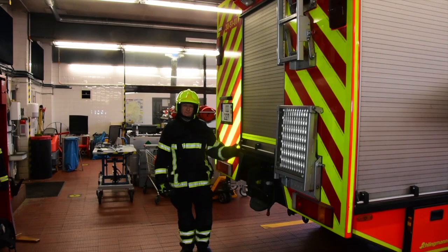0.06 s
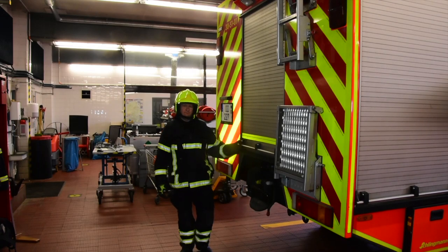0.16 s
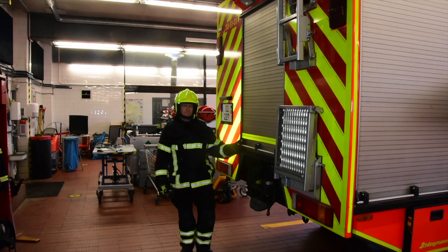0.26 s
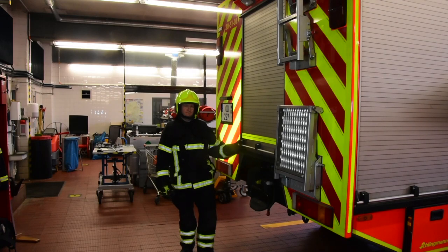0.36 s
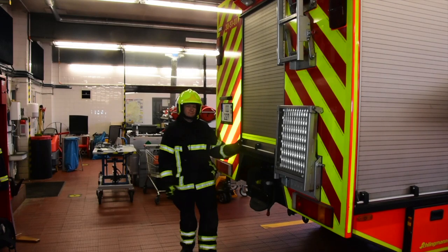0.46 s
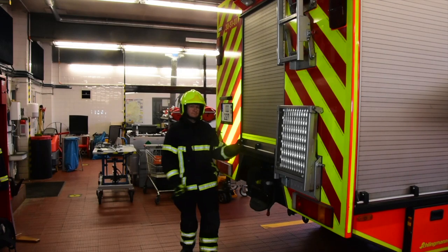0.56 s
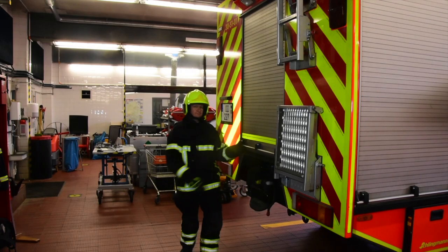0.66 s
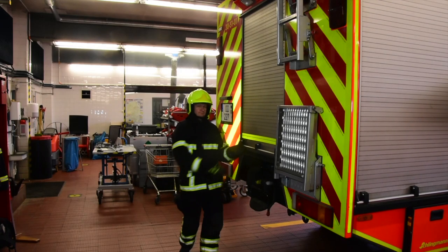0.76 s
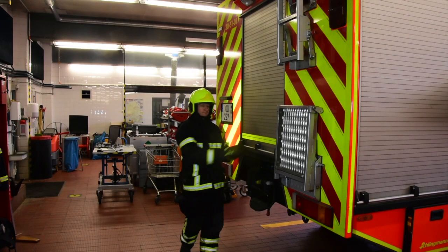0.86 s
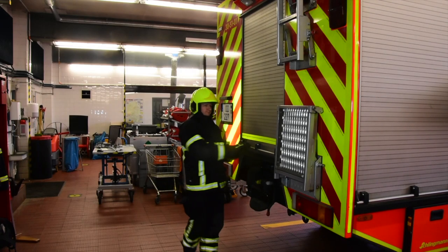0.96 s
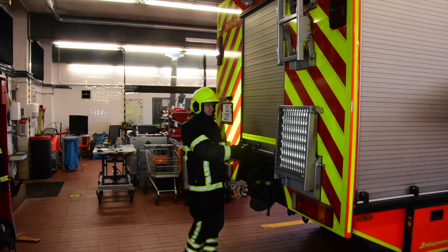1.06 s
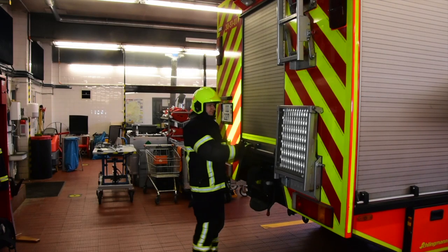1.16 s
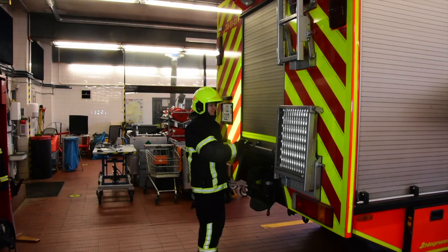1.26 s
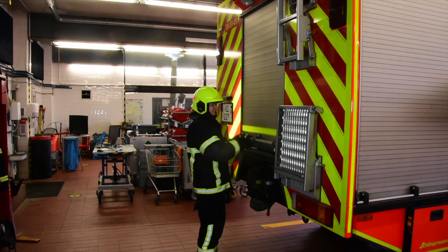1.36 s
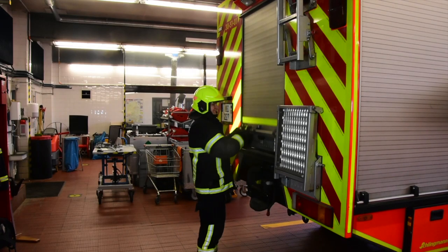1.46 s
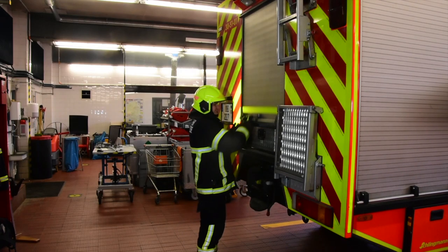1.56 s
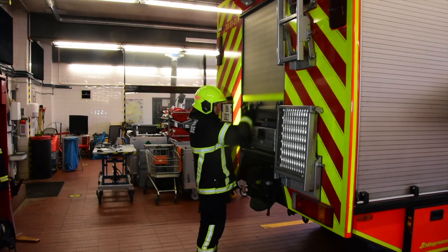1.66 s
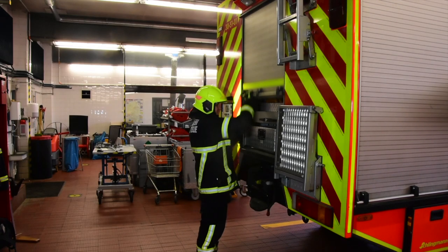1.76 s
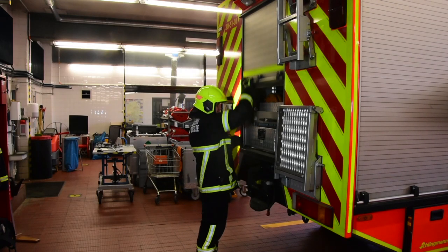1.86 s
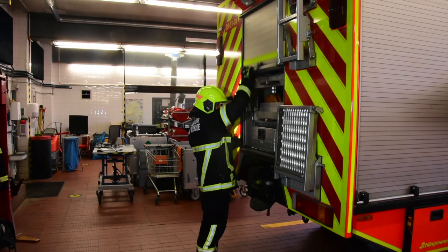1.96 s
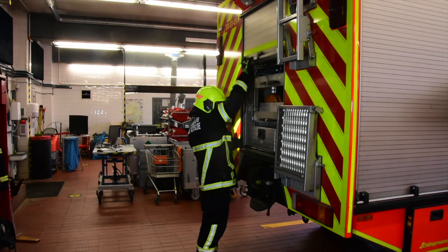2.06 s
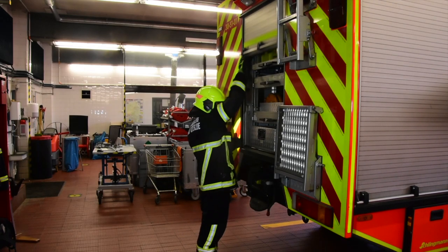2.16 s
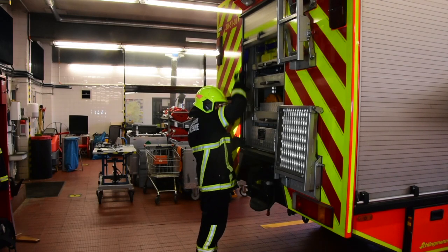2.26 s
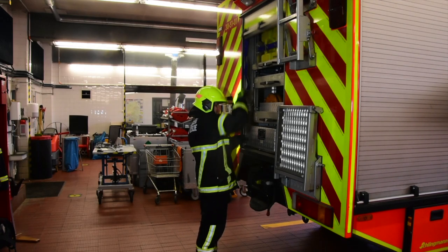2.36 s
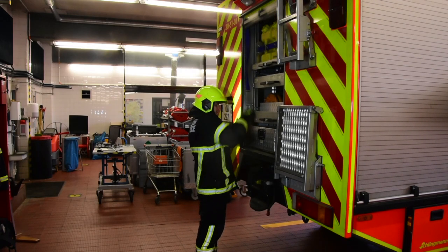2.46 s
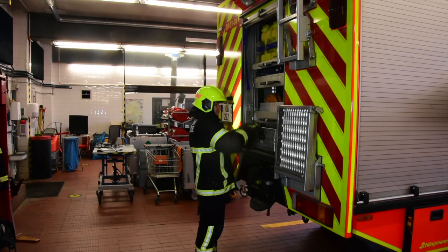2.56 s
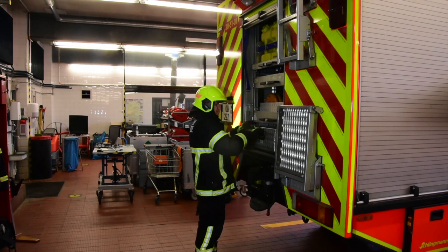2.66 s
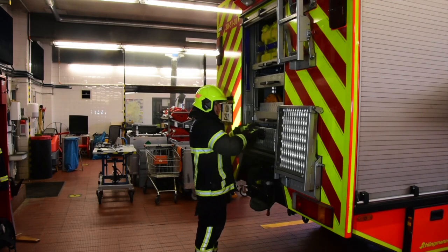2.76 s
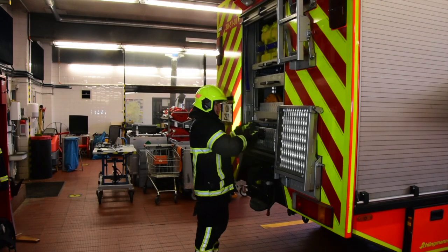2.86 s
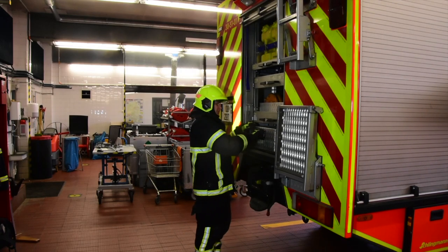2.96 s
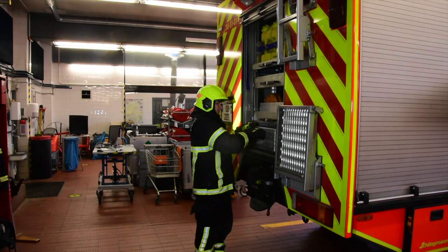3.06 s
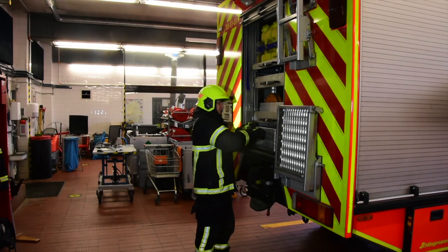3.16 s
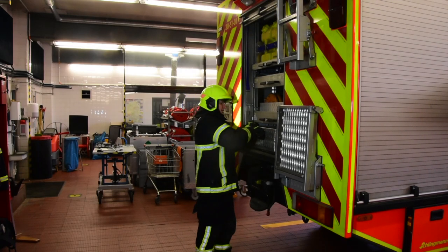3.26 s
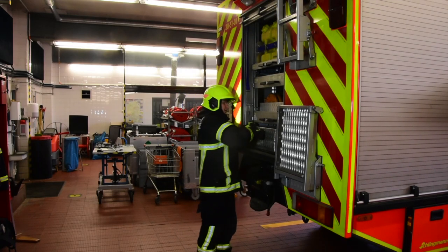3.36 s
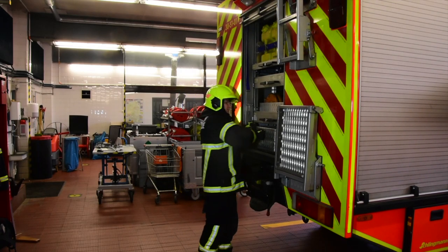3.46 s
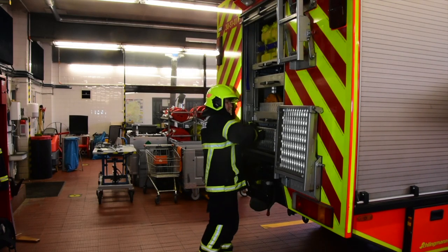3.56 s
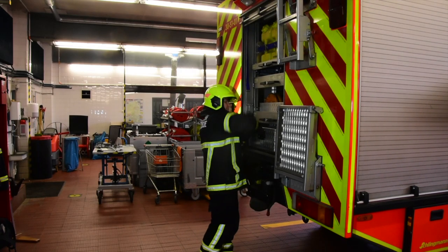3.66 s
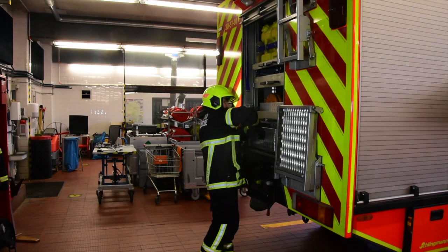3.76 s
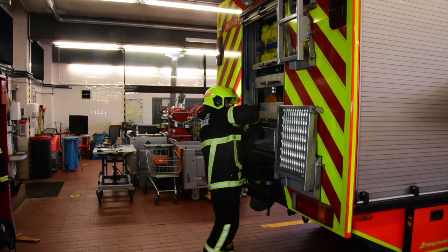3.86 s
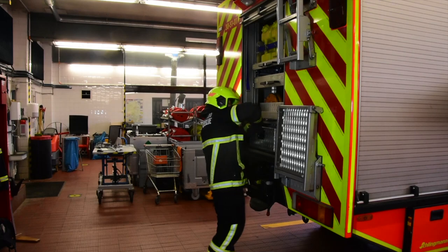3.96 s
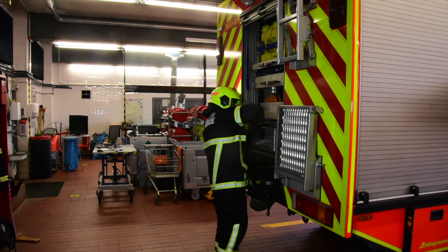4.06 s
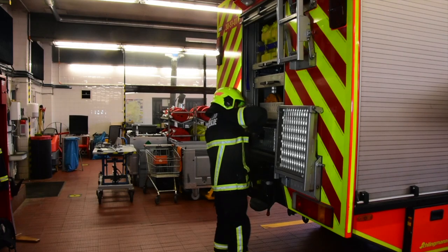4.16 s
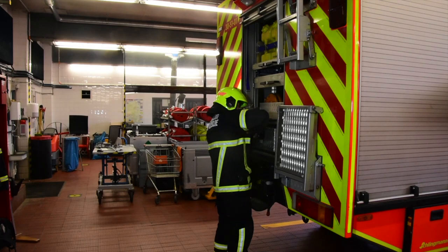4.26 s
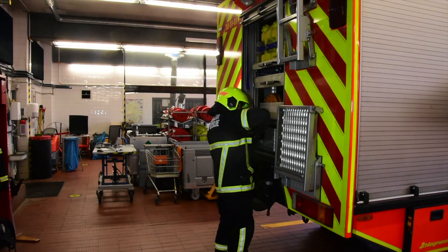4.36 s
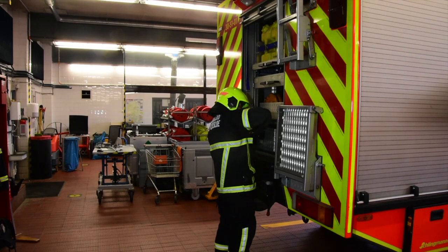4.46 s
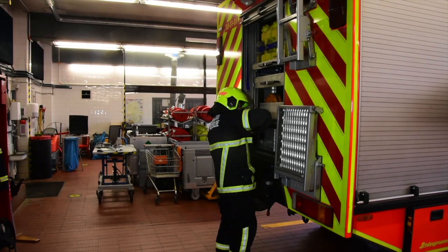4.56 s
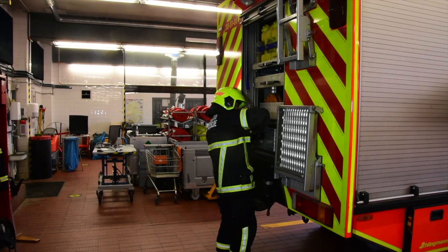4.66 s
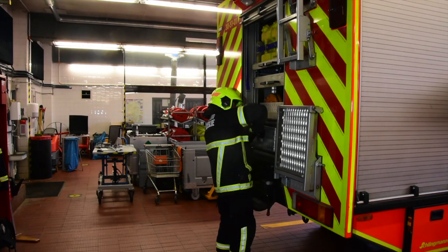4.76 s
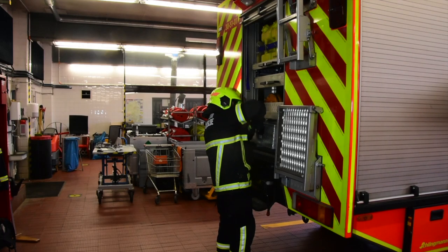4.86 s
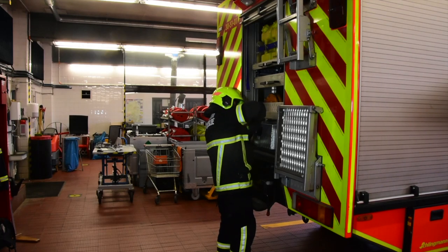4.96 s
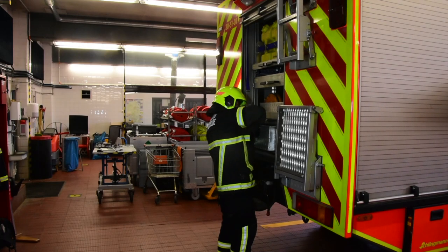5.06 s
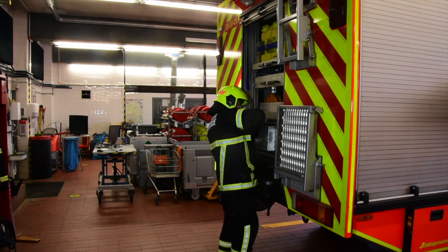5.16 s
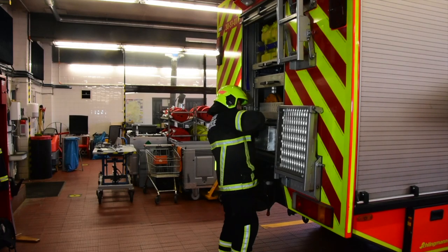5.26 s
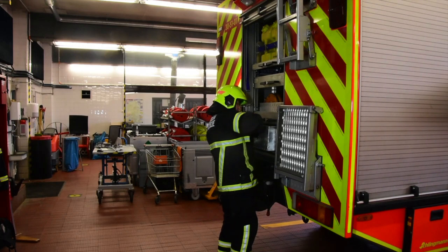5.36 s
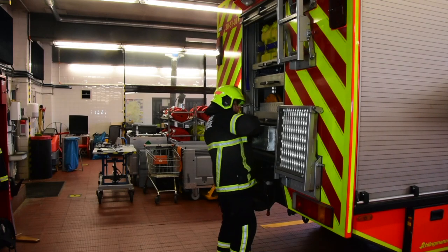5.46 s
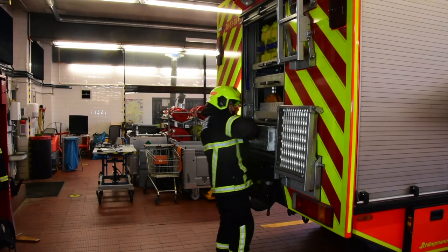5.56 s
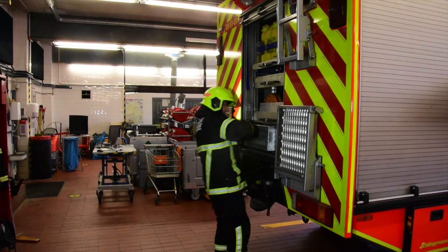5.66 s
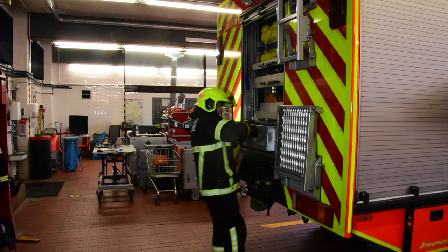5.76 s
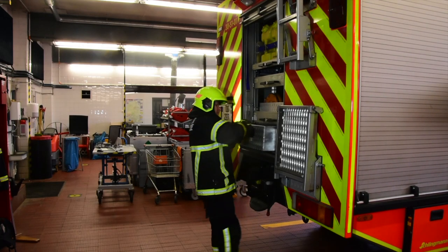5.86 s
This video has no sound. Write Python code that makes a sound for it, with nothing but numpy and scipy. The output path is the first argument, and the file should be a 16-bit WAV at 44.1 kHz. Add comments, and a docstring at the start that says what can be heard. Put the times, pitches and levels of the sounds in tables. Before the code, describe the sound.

In a hard, echoing garage, near quiet gives way to a faint creak and an aluminium shutter rattling up, its slats clacking rapidly and bumping home. Sparse knocks and rubs follow, with a tiny squeak and sharp catch snap. After a lull, a heavy rack slams its stop, judders, groans and settles with a thud. Mono, fairly close, with the loudest peaks flattened.

```python
"""An aluminium roller shutter on a truck's locker is pushed up in a garage: banded noise bursts make the
slats clack and bump home, over filtered chatter. Hands rummage with friction grains and knocks; a gliding
tone squeaks before the catch snaps. A loaded rack hits its stop with a loud clunk, judders as grains shake
its resonances, groans on its runners and settles with a thud. A limiter and soft clipper flatten the peaks."""
import sys
import numpy as np
from scipy import signal
from scipy.fft import rfft, irfft, next_fast_len
from scipy.io import wavfile
from scipy.ndimage import uniform_filter1d, minimum_filter1d

SR = 44100
rng = np.random.default_rng(int(sys.argv[2]) if len(sys.argv) > 2 else 0)


def inscribe(sig):
    """Save sig as 16-bit PCM at rate SR to the path in sys.argv[1].

    A 1-D sig is mono; a 2-D sig holds one channel per row.
    Samples are clipped to [-1, 1] before scaling.
    """
    pcm = np.round(np.clip(np.atleast_2d(sig).T, -1, 1) * 32767)
    wavfile.write(sys.argv[1], SR, pcm.astype(np.int16))


N = 260563
TIME = np.arange(N) / SR

# Blows: start_s, relative level_db, bass_db re middle, treble_db re middle, ring length factor
# loudest slats clacking onto the roll and bumping home [s, dB, dB, dB, factor]
SLATS = [(1.344, -15, -32, -23, 0.22), (1.434, -16, -17, -14.5, 1), (1.505, -8.5, -10.5, -17.5, .7),
         (1.571, -11.5, -15, -16, 0.12), (1.598, -4, -12, -16.5, 0.91), (1.644, -3, -8.5, -13.5, 0.87),
         (1.68, -13, -3, -13.5, 0.69), (1.73, -9.5, -16, -18, 1), (1.78, -11.5, -5, -16, 1),
         (1.828, -3, -6, -18.5, .75), (1.879, -6.5, -6, -18, 1), (1.925, -13.5, -1.5, -13, 0.73),
         (1.943, -10, -7, -14, 1), (1.976, -10.5, -2.5, -16, .9), (2.006, -6.5, -2.5, -15.5, 1),
         (2.093, -11.5, -3, -13, 1), (2.146, -10.5, 0, -17, 1), (2.222, -11.5, -12, -12.5, 0.96),
         (2.288, -13, 1, -14.5, 0.49), (2.37, -10.5, -13.5, -16.5, 0.99), (2.464, -6.5, -5.5, -13.5, 0.63),
         (2.52, -9.5, 5, -14, 0.69), (2.542, -6, -2, -9.5, 1), (2.554, -3.5, 0.5, -12.5, 1),
         (2.586, -3.5, -11.5, -17.5, 1), (2.618, -8.5, -4, -19, 1), (2.805, -16.5, -6, -30, 1),
         (2.873, -15, 0, -10, 0.89), (2.896, -14.5, -4.5, -26, 1), (3.042, -15, -10.5, -23.5, 0.8)]
# knocks of hands, catches and gear [s, dB, dB, dB, factor]
KNOCKS = [(0.132, -42, -3, -14, 0.25), (0.665, -40.5, -23, -14, 0.35), (1.023, -34, 2, -17, 0.71),
          (1.599, -9.5, -24, -12, 1.5), (1.645, -7, -25, -14, 1.9), (2.986, -19.5, -31, -2.5, 0.92),
          (3.219, -19.5, -8, -11.5, 1.5), (3.323, -10.5, -14, -15, 1), (3.495, -21.5, -14, -16.5, 2.2),
          (3.663, -14, -15, 0.5, 6.2), (3.692, -3.5, -9, -2.5, 1.43), (3.697, -9.5, -1.5, -12, 0.64),
          (3.874, -22.5, 0.5, -17, 1.7), (3.903, -25.5, 6, -6.5, 2.9), (3.99, -16.5, 2.5, -13, 0.99),
          (4.235, -20, 0.5, -35, 0.092), (4.299, -29.5, 2, -18, 0.7), (4.418, -33.5, 14, -10.5, 2.1),
          (4.834, -13.5, -9.5, -13, 3.4), (5.727, -15, -6.5, -9.5, 0.74)]
# the rack hitting its stop, bouncing and settling [s, dB, dB, dB, factor]
CLUNKS = [(4.883, 6, -5, -11.5, 1), (4.889, 12, -1.5, -13, 1), (4.994, -7, 9.5, -31, 0.6),
          (5.064, -6, 5, -13.5, 1), (5.111, -8, 8.5, -17, 0.47), (5.126, -7, 11, -30, 0.85),
          (5.427, -1.5, -4, -41, 0.61)]
# light ticks of small fittings: start_s, relative level_db
TICKS = [(3.024, -20), (4.0967, -14), (4.209, -17), (4.975, -19), (5.33, -13.5), (5.4196, -26),
         (5.675, -17)]

# Movements
# the curtain sliding in its guides: time_s, relative rumble_db, relative rattle_db
SLIDE = [(1.26, -36.5, -38), (1.398, -35.5, -35), (1.694, -26.5, -30), (1.828, -31, -27),
         (2.186, -32.5, -35), (2.518, -27.5, -30), (2.658, -31.5, -37), (2.916, -41.5, -38.5),
         (3.12, -40.5, -44.5)]
# dragged gear and stiff clothing: start_s, length_s, rise_s (for 20 dB), relative drag_db, relative rustle_db
STROKES = [(0.0, 0.0055, .01, -52, -58.5), (0.805, 0.18, 0.31, -55.5, -62.5),
           (1.166, 0.23, 0.19, -55.5, -52), (3.09, 0.034, 0.11, -44, -64), (3.305, 0.038, .06, -36, -48.5),
           (3.485, 0.055, .1, -47.5, -56), (3.869, 0.059, 0.12, -32.5, -48), (4.24, 0.074, 0.3, -37, -50),
           (4.418, 0.12, 0.035, -40.5, -54.5), (4.594, 0.2, .1, -69.5, -58),
           (4.852, 0.019, 0.059, -26, -38), (5.423, 0.042, 0.3, -42.5, -46.5),
           (5.879, 0.05, 0.15, -33.5, -35)]
# the rack surging along its runners: start_s, length_s, rise_s (for 20 dB), shake_db, scrape_db, groan_db, groan_hz
SURGES = [(4.885, .115, .004, -11.5, -31.5, -4.5, 314), (5.103, .05, 0.081, -13, -30.5, -6.5, 296.4),
          (5.28, .03, 0.089, -29.5, -44.5, -33, 299.6)]

# Stick-slip tones: start_s, length_s, central pitch_hz, glide_octaves, midway level_db
# squeaks of the guide and of a catch [s, s, Hz, octaves, dB]
SQUEAKS = [(2.984, 0.023, 990, 0.032, -25.5), (3.663, 0.027, 3180, -.12, -16.5)]
# creak of the lift bar [s, s, Hz, octaves, dB]
BAR_CREAK = (1.17, .07, 254, .2, -34)
# overtone balance of the creak: multiple of the pitch, relative level_db
CREAK_PARTIALS = [(2, 1), (3, -10), (4, -7.5), (6, -13), (8, -7)]
# overtone balance of the squeaks: multiple of the pitch, relative level_db
SQUEAK_PARTIALS = [(1, 2.5), (2, -8.5), (3, -17), (4, -29)]

# resonances of the rack and locker: mode_hz, width_hz, relative level_db
RACK_MODES = [(105, 9, -14), (139.8, 2.1, -3.5), (185, 6.5, -11), (228.4, 6.3, -1.5), (290, 3.7, -6),
              (351.4, 3.2, -4.5), (387, 2.8, -0.5), (438, 9.5, -28), (490, 30, -39), (554, 2.4, -3.5),
              (608, 4, 0.5), (890, 21, -9), (1080, 54, -26), (2040, 65, -21.5), (2110, 55, -28)]
# brief ring of the steel stop: mode_hz, level_db
STOP_MODES = [(2010, -9), (2260, -2.5), (2400, -16.5)]

# Spectra: frequency_hz, relative density_db per Hz
# slat blows [Hz, dB]
SLAT_COLOUR = [(45, -32), (65, -29), (100, 12), (160, 0.5), (250, 19), (500, 13), (800, 7), (1300, -1.5),
               (2100, 7), (2900, -11.5), (4500, 7.5), (6300, -8.5), (8000, -17), (10500, -11), (15500, -20)]
# knocks [Hz, dB]
KNOCK_COLOUR = [(45, -29), (120, 8), (300, 25), (500, 8), (900, 4.5), (2000, -2), (3000, 2), (4500, -1.5),
                (6500, -5), (9000, -14), (15500, -28)]
# rack clunks [Hz, dB]
CLUNK_COLOUR = [(45, -31), (130, 0.5), (310, 19.5), (580, 15.5), (720, 9), (920, 7), (1400, -2),
                (2200, -2.5), (3000, -7), (4500, -2.5), (8000, -14.5), (15500, -21.5)]
# small fittings [Hz, dB]
TICK_COLOUR = [(45, -33), (1200, -18), (2600, 1.5), (5000, -12), (9000, -13.5), (15500, -26.5)]
# slat chatter in the guides [Hz, dB]
SLIDE_COLOUR = [(35, -55), (60, -61), (100, -3.5), (160, -3), (240, -4), (640, -4.5), (1300, -6.5),
                (2100, -8.5), (3100, -19.5), (4800, -24), (6400, -27.5), (8100, -45), (10000, -30),
                (15500, -59)]
# dragged gear [Hz, dB]
DRAG_COLOUR = [(29, -63), (50, -33), (155, -3.5), (352, -2), (488, -2.5), (550, -3.5), (589, -4.5),
               (1070, -16.5), (1510, -21), (2020, -21.5), (3000, -87), (3900, -55), (6600, -120)]
# stiff clothing [Hz, dB]
RUSTLE_COLOUR = [(200, -12), (700, 11), (1200, 5), (2200, 1.5), (3500, -7), (6000, -15.5), (9000, -21),
                 (15500, -24.5)]
# runners scraping [Hz, dB]
SCRAPE_COLOUR = [(200, -20), (700, 5), (1000, -1), (1400, 15.5), (2100, 2.5), (3200, -1.5), (6000, -15.5),
                 (9000, -42), (15500, -39)]
# tail of the garage [Hz, dB]
GARAGE_COLOUR = [(45, -13), (150, 15.5), (500, -1.5), (2000, 2.5), (6000, -9.5), (9000, -6), (15500, 4)]
# still air [Hz, dB]
AIR_COLOUR = [(26, -52), (45, -16), (200, -3.5), (910, -15), (1030, -15.5), (1310, -16.5), (1410, -14),
              (2250, -19.5), (4350, -27), (15500, -41)]

# Decay times to -60 dB at ring factor 1: frequency_hz, t60_s
# slats [Hz, s]
SLAT_T60 = [(100, 0.1), (500, 0.11), (2000, 0.21), (6000, 0.12), (15000, 0.094)]
# knocked gear [Hz, s]
KNOCK_T60 = [(100, 0.54), (320, 0.31), (800, 0.12), (2500, 0.06), (6000, 0.032), (15000, 0.03)]
# struck rack [Hz, s]
CLUNK_T60 = [(100, 0.07), (320, 0.22), (800, 0.1), (2500, 0.1), (15000, 0.016)]
# small fittings [Hz, s]
TICK_T60 = [(100, 0.018), (15000, 0.0067)]
# first crack of any blow [Hz, s]
CRACK_T60 = [(100, 0.026), (600, 0.0098), (15000, 0.059)]
# garage [Hz, s]
GARAGE_T60 = [(100, 0.62), (500, 1.31), (2500, 0.9), (6000, 0.93), (15000, 0.3)]

# band-passes from 35 Hz to 17.5 kHz: centre_hz, width_hz, filter
EDGES = np.geomspace(35, 17500, 22)
BANDS = [(np.sqrt(lo * hi), hi - lo, signal.butter(2, [lo, hi], "band", fs=SR, output="sos"))
         for lo, hi in zip(EDGES, EDGES[1:])]

# the curtain starts with a jerk and coasts out: times for 20 dB
START_S, COAST_S = 0.073, 0.22
# strokes and surges die away: times for 20 dB
STROKE_FALL_S, SURGE_FALL_S = 0.19, .05
# the groan builds up to a hold at the end of each surge; build and fall are times for 20 dB
GROAN_BUILD_S, GROAN_HOLD_S, GROAN_FALL_S = 0.072, 0.02, 0.027
SQUEAK_EDGE_DB = 17  # a stick-slip tone starts and ends this far below its middle
SQUEAK_WAVER = .018  # share of the pitch
BAR_SAG_OCTAVES = .45  # pitch dips this far midway, relative to both ends
STOP_T60_S = .05
# lighter clacks: level over the rattle table, its spread, bass and treble re middle, ring length factor
LOOSE_SLAT_DB, LOOSE_SPREAD_DB, LOOSE_BASS_DB, LOOSE_TREBLE_DB, LOOSE_RING = 12.5, 0.5, -4.5, -14, 0.44
# load bumps: relative level over the shaking, bass and treble re middle, ring length factor
LOAD_DB, LOAD_BASS_DB, LOAD_TREBLE_DB, LOAD_RING = 3.5, 2.5, -25, 0.52
# a loose fitting jiggles: first touch, gap, relative level of the first touch, loss per touch
JIGGLE_S, JIGGLE_GAP_S, JIGGLE_DB, JIGGLE_LOSS_DB = 5.369, .0085, -11.5, 0.5
AIR_DB = -60
CUTOFF_HZ = 15800


def from_db(db):
    """Decibels to gain."""
    return 10 ** (np.asarray(db) / 20)


def rms_one(x):
    """Scale to unit power."""
    return x / np.sqrt(np.mean(x ** 2) + 1e-20)


def energy_one(x):
    """Scale to unit energy."""
    return x / np.sqrt(np.sum(x ** 2) + 1e-20)


def at_hz(points, hz):
    """Read a table on a log-frequency axis."""
    freqs, values = np.transpose(points)
    return np.interp(np.log(hz), np.log(freqs), values)


def drift(rate):
    """Smooth random wander of spread one, with rate knots a second."""
    knots = rng.standard_normal(20000)
    return rms_one(np.interp(TIME * rate, np.arange(len(knots)), knots))


def envelope(start, length, rise, fall):
    """Attack, hold and release as a gain; rise and fall are the times for 20 dB."""
    before = np.maximum(start - TIME, 0) / max(rise, .001)
    after = np.maximum(TIME - start - length, 0) / max(fall, .001)
    return from_db(-20 * np.minimum(before + after, 8))


def add(out, sound, s):
    """Mix a sound in at time s."""
    start = max(round(s * SR), 0)
    out[start:start + len(sound)] += sound[:max(N - start, 0)]


def convolve(x, response):
    """Pass a sound through a response."""
    return signal.fftconvolve(x, response)[:N]


def coloured(x, colour):
    """Give a sound a spectrum; unit power."""
    size = next_fast_len(N)
    hz = np.maximum(np.fft.rfftfreq(size, 1 / SR), 1)
    spectrum = rfft(x, size) * from_db(at_hz(colour, hz))
    return rms_one(irfft(spectrum, size)[:N])


def response(colour, t60s, length, ring=1, tint=((100, 0), (1000, 0)), uneven_db=0):
    """Countless close modes of a panel or room: every band dies at its own rate and is struck unevenly."""
    t, out = np.arange(int(length * SR)) / SR, 0
    for hz, width, sos in BANDS:
        t60 = at_hz(t60s, hz) * max(ring, .1)
        dying = rng.standard_normal(len(t)) * np.exp(-np.log(1000) * t / t60)
        db = at_hz(colour, hz) + at_hz(tint, hz) + uneven_db * rng.uniform(-0.68, 1)
        band = energy_one(signal.sosfilt(sos, dying))
        out = out + band * np.sqrt(width / 1000) * from_db(db)
    return out


def grains(per_s, spread_db):
    """Tiny contacts at random moments, most weak and a few strong."""
    sizes = from_db(spread_db * np.minimum(rng.exponential(1, N), 4)) * rng.choice([-1, 1], N)
    return sizes * (rng.random(N) < per_s / SR)


def friction(colour, per_s, spread_db):
    """Dense grains of two surfaces rubbing; unit power."""
    return coloured(grains(per_s, spread_db), colour)


def blows(table, colour, t60s, crack_db, ring_db):
    """Each blow gives a short crack and rings the body, with its own weight and hardness."""
    out = np.zeros(N)
    for s, db, bass_db, treble_db, ring in table:
        # a soft contact lasts longer, so its treble starts to fall at a lower pitch
        knee_hz = np.interp(treble_db, [-45, -22], [850, 2600])
        tint = [(480, bass_db), (750, 0), (knee_hz, 0), (3700, treble_db)]
        crack = response(colour, CRACK_T60, length=.02, tint=tint, uneven_db=3)
        add(out, from_db(db + crack_db) * crack, s)
        # longer rings are cut off at 0.15 s
        body = response(colour, t60s, length=.15, ring=ring, tint=tint, uneven_db=2)
        add(out, from_db(db + ring_db) * body, s)
    return out


def squeal(row, partials, waver, flutter_db, sag=0):
    """Stick-slip friction: an unsteady tone with overtones that swells, glides and fades."""
    start, length, hz, glide, db = row
    # place runs from -1 at the start to 1 at the end
    place = np.clip(2 * (TIME - start) / length - 1, -1, 1)
    pitch = hz * 2 ** (glide * place / 2 + sag * place ** 2) * (1 + waver * drift(900))
    phase = 2 * np.pi * np.cumsum(pitch) / SR
    level_db = db - SQUEAK_EDGE_DB * np.abs(place) + flutter_db * drift(450)
    level = from_db(level_db) * (np.abs(place) < 1)
    return level * rms_one(sum(from_db(d) * np.sin(round(k) * phase) for k, d in partials))


def still_air():
    """Steady noise with the spectrum of the garage's still air."""
    return from_db(AIR_DB) * coloured(rng.standard_normal(N), AIR_COLOUR)


def garage(x):
    """A long tail that builds up within milliseconds, returned from the far walls."""
    tail = response(GARAGE_COLOUR, GARAGE_T60, length=1.3)
    build_up = 1 - np.exp(-np.arange(len(tail)) / (SR * 0.0032))
    return convolve(x, energy_one(tail * build_up))


def handling():
    """Gear is dragged in fits and knocked, sleeves rustle, fittings tick, a catch squeaks before it snaps."""
    drag = rustle = 0
    for s, length, rise, drag_db, rustle_db in STROKES:
        stroke = envelope(s, length, rise, STROKE_FALL_S)
        drag = drag + from_db(drag_db) * stroke
        rustle = rustle + from_db(rustle_db) * stroke
    out = drag * from_db(3.2 * drift(65)) * friction(DRAG_COLOUR, per_s=810, spread_db=2.5)
    out += from_db(3.5) * rustle * friction(RUSTLE_COLOUR, per_s=18000, spread_db=0.5)
    # a loose fitting jiggles as the rack comes to rest
    jiggle = [(JIGGLE_S + k * JIGGLE_GAP_S, JIGGLE_DB - k * JIGGLE_LOSS_DB) for k in range(4)]
    for s, db in list(TICKS) + jiggle:
        add(out, from_db(db - 6.5) * response(TICK_COLOUR, TICK_T60, length=.05), s)
    out += blows(KNOCKS, KNOCK_COLOUR, KNOCK_T60, crack_db=2.5, ring_db=5.5)
    for row in SQUEAKS:
        out += squeal(row, SQUEAK_PARTIALS, waver=SQUEAK_WAVER, flutter_db=3.5)
    return out


def stop_ring():
    """The steel stop's own modes, struck by the first clunk and dying together."""
    t = np.maximum(TIME - CLUNKS[0][0], 0)
    dying = from_db(-60 * np.minimum(t / STOP_T60_S, 3))
    return dying * sum(from_db(db) * np.sin(2 * np.pi * hz * t) for hz, db in STOP_MODES)


def load_bumps(count):
    """Each surge shakes the load into a few uneven bumps: rows like those of CLUNKS."""
    bumps = []
    for s, length, _, shake_db, *_ in SURGES:
        for k in range(count):
            time = s + length * (k + rng.random()) / count
            db = shake_db + LOAD_DB + rng.uniform(-1.5, 1.5)
            bumps.append((time, db, LOAD_BASS_DB, LOAD_TREBLE_DB, LOAD_RING))
    return bumps


def rack_frame():
    """Random contacts at the runners excite the frame's narrow resonances; unit power."""
    frame = 0
    for hz, width, db in RACK_MODES:
        mode = signal.lfilter(*signal.iirpeak(hz, hz / width, fs=SR), grains(per_s=1500, spread_db=1.0))
        # the load presses steadily, so each mode keeps an even strength
        strength = np.sqrt(uniform_filter1d(mode ** 2, size=4000) + 1e-12)
        frame = frame + from_db(db) * mode / strength
    return rms_one(frame)


def rack():
    """The rack slams into its stop and surges on; its runners shake the frame, scrape, and groan by stick-slip."""
    shake = groan = scrape = 0
    unsteady = 1 + 0.0149 * drift(60)
    for s, length, rise, shake_db, scrape_db, groan_db, groan_hz in SURGES:
        surge = envelope(s, length, rise, SURGE_FALL_S)
        shake = shake + from_db(shake_db) * surge
        scrape = scrape + from_db(scrape_db) * surge
        tone = rms_one(np.sin(2 * np.pi * np.cumsum(groan_hz * unsteady) / SR))
        swell = envelope(s + length - GROAN_HOLD_S, GROAN_HOLD_S, GROAN_BUILD_S, GROAN_FALL_S)
        groan = groan + from_db(groan_db) * tone * swell
    frame = rack_frame()
    metal = from_db(5.6 * drift(140)) * coloured(rng.standard_normal(N), SCRAPE_COLOUR)
    hits = blows(list(CLUNKS) + load_bumps(count=3), CLUNK_COLOUR, CLUNK_T60, crack_db=1.5, ring_db=8.5)
    return shake * frame + groan + scrape * metal + hits + stop_ring()


def loose_slats(count):
    """Slats pass at random moments, their level following the rattle, each with its own colour: rows like SLATS."""
    s, _, rattle_db = np.transpose(SLIDE)
    when, strength, weight, hardness = rng.uniform(-1, 1, (count, 4)).T
    times = s[0] + (s[-1] - s[0]) * (1 + when) / 2
    db = np.interp(times, s, rattle_db) + LOOSE_SLAT_DB + LOOSE_SPREAD_DB * strength
    bass_db = LOOSE_BASS_DB + 6 * weight
    treble_db = LOOSE_TREBLE_DB + 4 * hardness
    return list(zip(times, db, bass_db, treble_db, np.full(count, LOOSE_RING)))


def shutter():
    """Slats chatter over the curtain's rumble, single ones clack as they turn onto the roll, the lift bar creaks."""
    s, rumble_db, rattle_db = np.transpose(SLIDE)
    moving = envelope(s[0], s[-1] - s[0], START_S, COAST_S)
    rumble = moving * from_db(np.interp(TIME, s, rumble_db))
    rattle = moving * from_db(np.interp(TIME, s, rattle_db))
    # every small contact between slats buzzes for a few ms
    contacts = grains(per_s=1000, spread_db=1.5) ** 2
    buzzing = signal.lfilter([1], [1, -np.exp(-1 / (0.0028 * SR))], contacts)
    chatter = coloured(np.sqrt(buzzing) * rng.standard_normal(N), SLIDE_COLOUR)
    low = rms_one(signal.sosfilt(signal.butter(3, 600, "low", fs=SR, output="sos"), chatter))
    high = rms_one(signal.sosfilt(signal.butter(3, 600, "high", fs=SR, output="sos"), chatter))
    clacks = blows(list(SLATS) + loose_slats(count=56), SLAT_COLOUR, SLAT_T60, crack_db=5.0, ring_db=2.5)
    creak = squeal(BAR_CREAK, CREAK_PARTIALS, waver=0.018, flutter_db=2, sag=BAR_SAG_OCTAVES)
    return from_db(.5) * rumble * low + from_db(-3.5) * rattle * high + clacks + creak


def scene():
    """All locker sounds, their garage tail and the still air, with the deep bass cut."""
    locker = shutter() + handling() + rack()
    heard = locker + from_db(-20.5) * garage(locker) + still_air()
    return signal.sosfilt(signal.butter(3, 60, "high", fs=SR, output="sos"), heard)[None]


def record(dry):
    """A look-ahead limiter tames the loudest blows, a soft clipper flattens the rest, and the top is cut."""
    release_db_per_s, threshold_db = 400, 3.5  # threshold is above full scale
    excess = np.maximum(20 * np.log10(np.abs(dry) + 1e-9) - threshold_db, 0)
    # the sliding maximum reaches 65 samples to either side
    ahead = -minimum_filter1d(-excess, size=130)
    release = release_db_per_s * TIME
    held = np.maximum.accumulate(ahead + release, axis=-1) - release
    limited = dry * from_db(-uniform_filter1d(held, size=130))
    clipped = limited / (1 + limited ** 12) ** (1 / 12)
    return signal.sosfilt(signal.ellip(10, .1, 70, CUTOFF_HZ, fs=SR, output="sos"), clipped)


dry = scene()
out = record(dry)
inscribe(out)
```